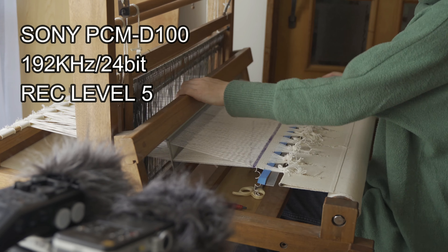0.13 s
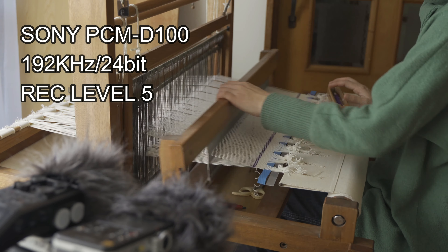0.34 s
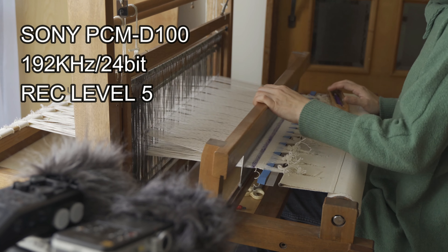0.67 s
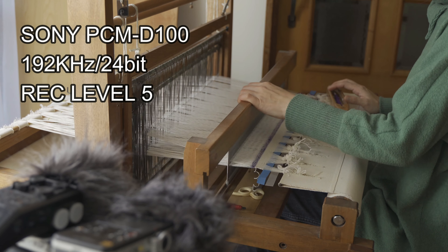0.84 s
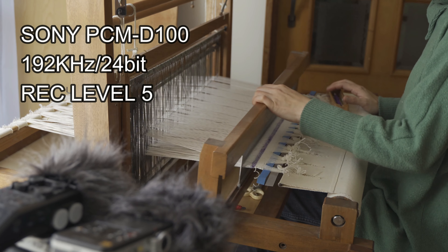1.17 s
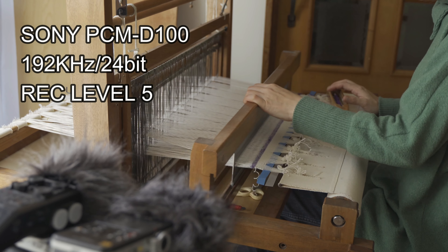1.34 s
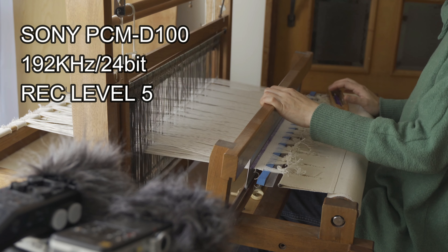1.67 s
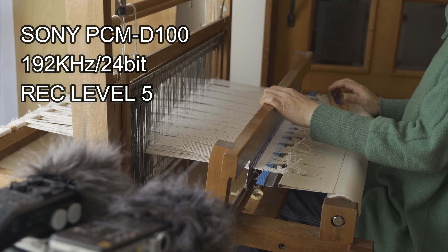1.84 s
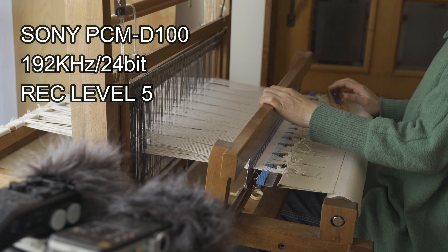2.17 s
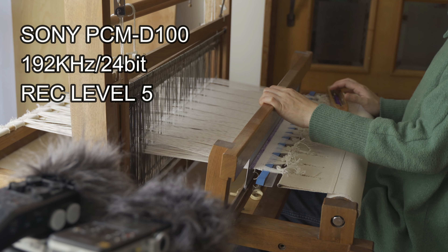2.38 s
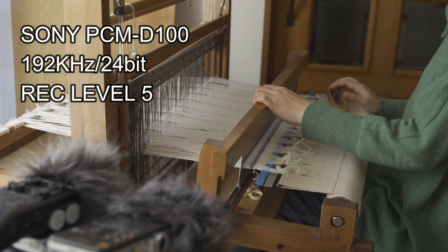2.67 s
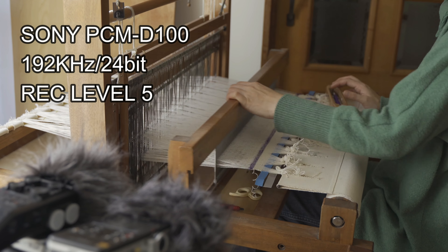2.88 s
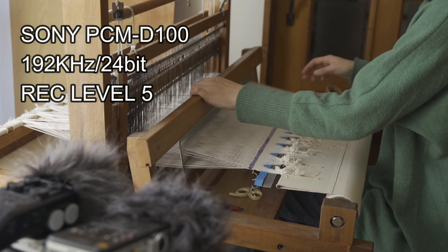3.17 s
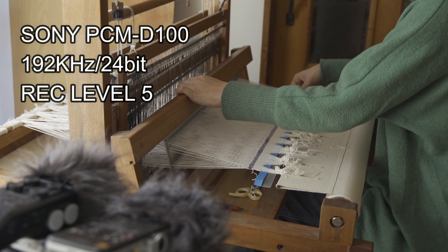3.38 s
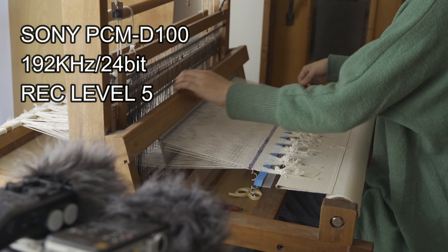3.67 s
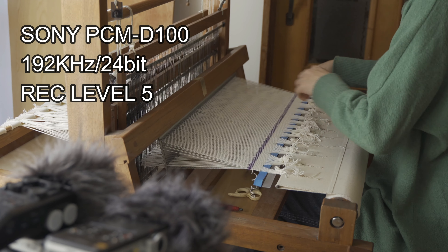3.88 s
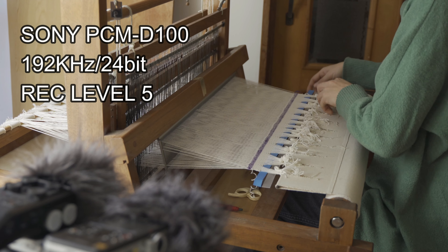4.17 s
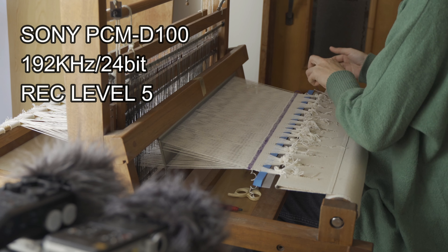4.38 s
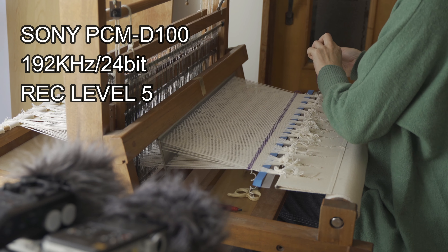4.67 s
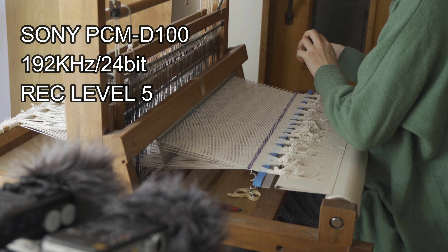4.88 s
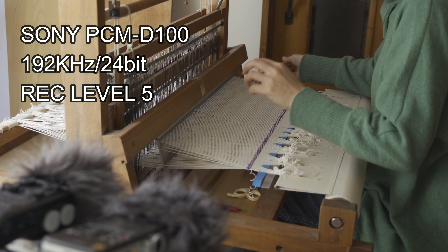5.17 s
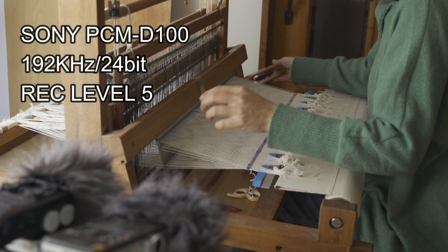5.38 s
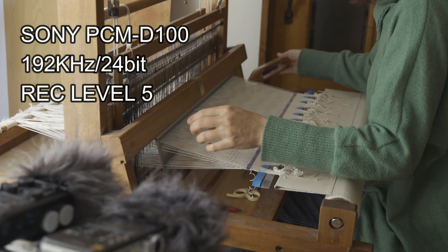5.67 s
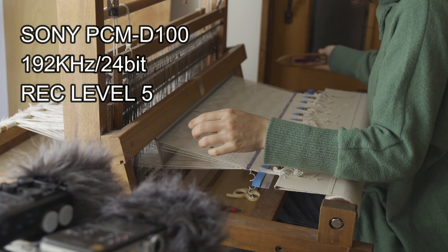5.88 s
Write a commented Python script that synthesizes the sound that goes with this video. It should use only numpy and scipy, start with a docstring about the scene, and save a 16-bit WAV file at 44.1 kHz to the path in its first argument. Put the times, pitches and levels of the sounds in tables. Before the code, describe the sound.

In a quiet small room, a loom rasps, batters out hollow wooden knocks, squeaks back against its stop, and settles into tiny shuttle clicks.

```python
"""A rasping scrape with faint squeaks swells up: the beater of a wooden hand loom swings forward in a small room.
Its reed rasps and sings by stick-slip friction along the warp, while struck wood, as decaying modes and noise,
knocks again and again, the frame thuds in low modes and the heddles chirp. The beater scrapes back and bangs
twice against its stop; small clicks of the shuttle follow, with soft friction noise of yarn and shuttle."""
import sys
import numpy as np
from scipy import signal
from scipy.io import wavfile

SR = 44100
rng = np.random.default_rng(int(sys.argv[2]) if len(sys.argv) > 2 else 0)


def dump(signal):
    """Clip the signal to [-1, 1] and save it as 16-bit WAV at the path in sys.argv[1]."""
    limited = np.clip(np.atleast_2d(signal).T, -1, 1)
    pcm = np.round(limited * 32767).astype(np.int16)
    wavfile.write(sys.argv[1], SR, pcm)


N = 265923
TIME = np.arange(N) / SR
RING_TIME = TIME[:18000]   # span of one blow
CUTOFF_HZ = 16300
EDGES = np.geomspace(22, 17000, 21)
# band filters: (centre frequency [Hz], filter sections)
BANK = [(np.sqrt(lo * hi), signal.butter(2, [lo, hi], "band", fs=SR, output="sos"))
        for lo, hi in zip(EDGES, EDGES[1:])]

# likeness of the left and right channels: (frequency [Hz], correlation [-1 to 1])
LIKENESS = [(60, 0.84), (300, 0.78), (1200, 0.84), (2500, 0.75), (5000, 0.58), (9000, 0.41), (13000, -0.62)]
# pushes of the beater that rock the whole loom: (time [s], level [dB], rebound relative level [dB])
PUSHES = [(0.278, -27.5, -0.5), (0.548, -25.5, -7), (0.679, -19, -11), (1.032, -24, -10),
          (1.163, -15.5, -0.5), (1.431, -23.5, 1.5), (1.604, -18, -1.5), (1.781, -28, -32),
          (2.071, -39.5, -7), (2.99, -25, -5)]


def from_db(db):
    """Amplitude gain is the exponential of a level in decibels."""
    return np.exp(np.asarray(db) * np.log(10) / 20)


def rms_one(x):
    """Normalisation: dividing by the root mean square gives an rms of 1."""
    return x / np.sqrt(np.mean(x ** 2) + 1e-20)


def at_hz(points, hz):
    """Linear interpolation of a table along log frequency."""
    table = np.array(points)
    return np.interp(np.log(hz), np.log(table[:, 0]), table[:, 1])


def drift(rate, size=N):
    """Slow random modulation: normal values, rate [per s] of them, joined by straight lines."""
    steps = np.arange(size) / SR * rate
    return np.interp(steps, np.arange(4000), rng.standard_normal(4000))


def dying(t60):
    """Exponential decay, by 60 dB in t60 [s]."""
    return np.exp(-np.log(1000) * RING_TIME / t60)


def add(out, s, sound):
    """Superposition: a sound is added to the mix from time s [s]."""
    start = max(round(s * SR), 0)
    out[:, start:start + sound.shape[-1]] += sound[..., :N - start]


def grains(spread_db, size=N):
    """Granular friction noise: two independent mid-side pairs of tiny contacts of uneven size."""
    sizes = np.minimum(rng.exponential(1, size), 6)
    return rms_one(rng.standard_normal((2, 2, size)) * from_db(spread_db * sizes))


def coloured(drive, gain_at):
    """Subtractive synthesis: band filters colour mid-side noise; channel correlation sets each band's width."""
    mid_side = 0
    for k, (hz, sos) in enumerate(BANK):
        alike = np.clip(at_hz(LIKENESS, hz), -.99, .99)
        balance = np.sqrt([[1 + alike], [1 - alike]])
        # neighbouring bands take different noise pairs
        mid_side = mid_side + signal.sosfilt(sos, drive[k % 2] * gain_at(hz) * balance)
    mid, side = mid_side
    return np.array([mid + side, mid - side])


def ringing(modes, uneven_db, width, detune):
    """Modal synthesis: decaying sines whose strength, pitch and stereo phase vary from blow to blow."""
    out = 0
    for hz, db, t60 in modes:
        size, turn, apart, shift = rng.standard_normal(4)
        phase = np.pi * (turn > 0) + width * apart * np.array([[1], [-1]])
        tone = np.sin(2 * np.pi * hz * (1 + detune * shift) * RING_TIME + phase)
        out = out + from_db(db + uneven_db * size) * dying(t60) * tone
    return out


def blows(table, spectrum, modes, crack_t60, room_db, modes_db, detune, press_t60, uneven_db):
    """Impact: a short noise crack of crowded modes, a few longer modes and the room's decaying tail."""
    # reverberation of the room: (frequency [Hz], t60 [s])
    room_t60 = [(150, 0.29), (500, 0.4), (1500, 0.25), (4000, 0.22), (12000, 0.18)]
    out, rows = np.zeros((2, N)), np.array(table, float)
    early = SR // 50   # crack and modes are balanced over the first 20 ms
    rows[:, 2:] -= rows[:, 2:].mean(axis=0)   # body and brightness relative to the mean blow
    for s, db, body_db, bright_db in rows:
        colour = [(420, body_db), (1000, 0.002), (2000, 0), (6000, bright_db)]

        def band_gain(hz):
            decay = dying(crack_t60) + from_db(room_db) * dying(at_hz(room_t60, hz))
            return from_db(at_hz(spectrum, hz) + at_hz(colour, hz)) * decay

        wood = coloured(grains(2.6, size=len(RING_TIME)), band_gain)
        tinted = [(hz, level + at_hz(colour, hz), t60) for hz, level, t60 in modes]
        ring = ringing(tinted, uneven_db, width=0.1, detune=detune)
        # dull, padded contacts build up more slowly
        press = 1 - dying(press_t60 * from_db(np.clip(-bright_db, -20, 14)))
        blow = wood / wood[:, :early].std() + from_db(modes_db) * ring / ring[:, :early].std()
        add(out, s, from_db(db) * press * blow)
    return out


def with_body(table, per_force, per_brightness):
    """Contact spectrum: the harder and brighter a contact, the less low body [dB lost per dB]."""
    return [(s, db, -per_force * db - per_brightness * bright_db, bright_db) for s, db, bright_db in table]


def rubbing(spectrum, grain_db, flutter_db):
    """Sliding friction: grainy noise of rms 1 whose bands fluctuate independently."""
    return rms_one(coloured(grains(grain_db), lambda hz: from_db(at_hz(spectrum, hz) + flutter_db * drift(25))))


def singing(hz, waver_hz, slips_per_s=300):
    """Stick-slip tone: uneven slips modulate the frequency, and a phase offset separates the channels."""
    phase = 2 * np.pi * np.cumsum(hz + waver_hz * drift(slips_per_s, size=len(hz))) / SR
    apart = np.arccos(np.clip(at_hz(LIKENESS, hz[0]), -1, 1)) / 2
    return np.sin(phase + apart * np.array([[1], [-1]]))


def swells(rows, rise_db_per_s, fall_db_per_s, sag_db_per_s=0):
    """Movement envelope [dB] of rows (s, length, dB): linear rise, hold and fall; the strongest prevails."""
    levels = []
    for s, length, db in rows:
        rise = rise_db_per_s * np.maximum(s - TIME, 0)
        sag = sag_db_per_s * np.clip(TIME - s, 0, length)
        fall = fall_db_per_s * np.maximum(TIME - s - length, 0)
        levels.append(db - rise - sag - fall)
    return np.max(levels, axis=0)


def after_pushes(delay_s, hold_s, level_db, follows):
    """Driven response: one movement (s, length, dB) per push, stronger and longer after a harder one."""
    usual_push_db = -20   # hold_s and level_db apply at this push
    extra = [(s, follows * (db - usual_push_db)) for s, db, _ in PUSHES]
    return [(s + delay_s, hold_s * from_db(db), level_db + db) for s, db in extra]


def shaft_level():
    """Forced motion [dB]: the shafts move when a push shakes them or a treadle lifts them."""
    # feet working the treadles: (time [s], length [s], level [dB])
    treadling = [(0.28, 0.334, -32.5), (0.93, 0.027, -35), (2.02, 0.011, -36), (2.53, 0.061, -43),
                 (2.72, 0.42, -39), (3.48, .01, -40.5)]
    shakes = after_pushes(delay_s=-.02, hold_s=0.1, level_db=-30.5, follows=0.51)   # just ahead of the push
    shaken = swells(shakes, rise_db_per_s=166.5, fall_db_per_s=105)
    return np.maximum(shaken, swells(treadling, rise_db_per_s=97, fall_db_per_s=45))


def reed_level():
    """Sliding motion [dB]: the reed rubs in strokes, on springing back, and faintly as the shafts move."""
    # beater swinging forward, later back:
    # (time at full speed [s], length [s], relative level [dB], rise [dB per s])
    swings = [(0.201, .15, -35, 52), (2.912, .39, -37, 191.5)]
    strokes = [swells([(s, length, db)], rise, fall_db_per_s=68, sag_db_per_s=14)
               for s, length, db, rise in swings]
    springs = after_pushes(delay_s=0.12, hold_s=.04, level_db=-45.5, follows=0.376)
    spring = swells(springs, rise_db_per_s=73.5, fall_db_per_s=52)
    rattle = shaft_level() - 17   # the reed shivers with the shafts
    return np.max([*strokes, spring, rattle], axis=0)


def air():
    """Stationary background noise: the spectrum of a quiet room."""
    # (frequency [Hz], relative density [dB])
    air_spectrum = [(20, 9), (70, -1.5), (120, -7), (220, -9), (500, -14), (1200, -22.5), (3000, -26),
                    (16000, -31)]
    noise = coloured(rng.standard_normal((2, 2, N)), lambda hz: from_db(at_hz(air_spectrum, hz)))
    return from_db(-56) * rms_one(noise)


def lean():
    """Low-frequency friction: the frame rumbles softly as the weaver leans on it."""
    # (time [s], length [s], level [dB])
    leanings = [(4.22, 0.041, -53.5), (4.95, .23, -54.5)]
    rumble = rubbing([(30, -16.5), (65, 9), (130, -34), (600, -60)], grain_db=0.0, flutter_db=2.0)
    return from_db(swells(leanings, rise_db_per_s=38, fall_db_per_s=53)) * rumble


def brush():
    """Broadband friction: yarn brushes the threads."""
    # (time [s], length [s], relative level [dB])
    strokes = [(3.79, 0.018, -53), (3.98, 0.052, -56), (4.22, 0.056, -59), (4.74, .2, -63.5),
               (5.15, 0.044, -61), (5.78, .02, -67), (6.02, 0.0082, -66.5)]
    # (frequency [Hz], relative density [dB])
    brush_spectrum = [(300, -16), (600, -5.5), (1800, -3), (2800, -11.5), (3600, -8.5), (5500, -17),
                      (12000, -21.5), (16000, -31.5)]
    level_db = swells(strokes, rise_db_per_s=51.5, fall_db_per_s=46.5) - 1.0
    return from_db(level_db) * rubbing(brush_spectrum, grain_db=5.5, flutter_db=2.5)


def shuttle(hz=4200, width_hz=300):
    """Resonant filtering of friction: the shuttle slides through the shed with a thin, narrow hiss."""
    # (time [s], length [s], level [dB])
    slides = [(5.08, 0.09, -58.5), (5.24, 0.075, -65.5), (5.785, 0.009, -67)]
    friction = rubbing([(1000, -6.5), (4000, 1), (12000, 15)], grain_db=5.0, flutter_db=4.0)
    hiss = signal.lfilter(*signal.iirpeak(hz, hz / width_hz, fs=SR), friction)
    return from_db(swells(slides, rise_db_per_s=280, fall_db_per_s=140)) * rms_one(hiss)


def clicks():
    """Light impacts: shuttle and fittings click, exciting small, high modes."""
    # (time [s], relative level [dB], brightness [dB])
    contacts = [(2.912, -20, 8), (3.396, -24, -12.5), (3.545, -25.5, -2), (3.566, -28, -8),
                (3.605, -24.5, -2.5), (3.788, -35, -2), (3.949, -25, 0), (4.209, -24, -3),
                (4.488, -35, 9.5), (4.812, -44, -5.5), (4.959, -50, -5), (5.204, -37, 17.5),
                (5.773, -43.5, 6), (5.788, -47.5, -6)]
    # colour of a click: (frequency [Hz], relative density [dB])
    click_spectrum = [(300, -51), (700, -19.5), (1150, -6.5), (2300, -11.5), (4000, -10.5), (7000, -20.5),
                      (16000, -35.5)]
    # ringing of shuttle and fittings: (nominal frequency [Hz], relative level [dB], t60 [s])
    click_modes = [(1016, -7.5, 0.14), (1367, -4, 0.27), (1900, -5, 0.17), (2320, -6.5, 0.15),
                   (2630, -0.5, .1), (3343, -18, 0.17), (3860, 0.5, 0.082), (5000, -15.5, .07),
                   (7000, -9, .1)]
    rows = with_body(contacts, per_force=.05, per_brightness=.05)
    return from_db(-14) * blows(rows, click_spectrum, click_modes, crack_t60=0.04, room_db=6.5,
                                modes_db=-3.0, detune=0.008, press_t60=0.0006, uneven_db=0.0)


def shift():
    """Friction under forced motion: the moving shafts rumble."""
    # (frequency [Hz], relative density [dB])
    shift_spectrum = [(22, -17.5), (55, 2), (110, -2), (200, -3), (300, -10), (450, -11), (800, -19),
                      (2500, -26), (5000, -55.5)]
    return from_db(shaft_level()) * rubbing(shift_spectrum, grain_db=4.0, flutter_db=4.0)


def squeaks(waver=0.0053, top_waver=0.028, wobble=0.0037, rough_db=5.0, overtone_db=-16):
    """Stick-slip oscillation: sticking steel sings brief, unsteady tones with weaker harmonics."""
    # reed wires and threads: (time [s], length [s], start [Hz], end [Hz], relative level [dB])
    tones = [(0.042, 0.25, 2420, 2475, -39.5), (0.077, 0.12, 1930, 1990, -47),
             (1.739, 0.23, 2950, 2860, -43.5), (2.826, 0.08, 4680, 4620, -44.5),
             (2.825, 0.074, 2320, 2390, -51), (2.865, 0.18, 2500, 2463, -32),
             (3.012, 0.1, 11000, 9560, -42.5), (3.24, 0.11, 2880, 2810, -41),
             (3.246, 0.079, 12600, 12500, -44), (2.92, 0.56, 852, 798, -45.5),
             (3.05, 0.408, 1280, 1340, -49.5), (3.46, 0.4, 810, 785, -45.5),
             (3.495, 0.21, 1350, 1325, -46.5), (4.613, 0.2, 2170, 1980, -64.5),
             (4.884, 0.1, 3670, 3550, -63.5)]
    # heddles chirping on a hard beat: (time [s], relative level [dB])
    chirp_times = [(0.668, -48), (1.007, -41), (1.159, -42.5), (1.472, -50), (1.604, -43.5)]
    # the two tones of every chirp: (delay [s], length [s], frequency [Hz], relative level [dB])
    chirp_tones = [(0, 0.061, 9440, 1.5), (0.053, 0.076, 12300, -10)]
    out = np.zeros((2, N))
    chirps = [(s + delay, length, hz, hz, db + tone_db)
              for s, db in chirp_times for delay, length, hz, tone_db in chirp_tones]
    for s, length, start_hz, end_hz, db in tones + chirps:
        n = int(length * SR)
        pitch = np.linspace(start_hz, end_hz, n) * (1 + wobble * drift(56, size=n))
        waver_hz = (top_waver if start_hz > 7000 else waver) * pitch
        for k in range(min(int(CUTOFF_HZ / start_hz), 3)):
            swell = signal.windows.tukey(n, .6) * rms_one(from_db(rough_db * drift(238, size=n)))
            tone = singing((k + 1) * pitch, waver_hz, slips_per_s=790)
            add(out, s, from_db(db + overtone_db * np.sqrt(k)) * swell * tone)
    return from_db(3) * out


def reed(glide=.008, flicker_db=12.5, rough_db=10.5, rise=.002, hiss_per_db=-0.1, song_per_db=.22, pair=.022):
    """Stick-slip on the reed: a rasp and wires singing in turns; speed sets treble, pitch and share of tone."""
    # colour of the rasp: (frequency [Hz], relative density [dB])
    scrape_spectrum = [(300, -15), (700, -8.5), (1400, -6), (2700, -4), (5000, -8), (8000, -13),
                       (11000, -19), (16000, -18)]
    # singing wires: (nominal frequency [Hz], waver [Hz], relative level [dB])
    reed_modes = [(773, 20, -19), (1337, 20, -3.5), (1935, 18, -4), (2214, 28, -9.5), (2477, 18, 0),
                  (2720, 19, -5.5), (2987, 25, -4.5), (3496, 32, -3), (4160, 24, -3), (4700, 34, -8),
                  (5200, 88, -4), (5650, 44, -20.5), (6180, 40, -10.5), (7220, 74, -9), (8190, 110, -12)]
    level_db = reed_level()
    n = np.flatnonzero(level_db > -70)[-1]   # silent from here on
    level_db = level_db[:n]
    speed_db = np.clip(level_db + 40, -15, 3)   # the level stands for the speed
    treble = from_db(hiss_per_db * speed_db)

    def band_gain(hz):
        return from_db(at_hz(scrape_spectrum, hz)) * (treble if hz > 8000 else 1)

    rasp = coloured(grains(2.76, size=n), band_gain)
    wires = 0
    for hz, waver_hz, db in reed_modes:
        for k in range(2):   # each wire has a weaker neighbour, tuned slightly higher
            flicker = flicker_db * np.tanh(drift(22, size=n))
            rough = rough_db * np.tanh(drift(200, size=n))
            pitch = hz * (1 + pair * k + glide * drift(12, size=n) + rise * speed_db)
            wires = wires + from_db(db - 2.1 * k + flicker + rough) * singing(pitch, waver_hz)
    song = from_db(0.5 + song_per_db * speed_db) * rms_one(wires)   # a slow reed mostly rasps
    scrape = from_db(level_db + 0.9) * (rms_one(rasp) + song)
    return np.pad(scrape, ((0, 0), (0, N - n)))


def thuds():
    """Low modes with inertia: the heavy frame starts rocking gradually after a push and after its rebound."""
    # (nominal frequency [Hz], relative level [dB], t60 [s])
    rocking_modes = [(47.8, -2, 0.64), (56.6, -5.5, 0.42), (74.9, 1.5, 0.36), (93.7, -9.5, 0.9),
                     (122.2, -4.5, 0.48), (141, -13, 0.16)]
    rebound_s = 0.061   # the frame lands a second time
    out = np.zeros((2, N))
    for s, db, rebound_db in PUSHES:
        for start, level_db in (s, db), (s + rebound_s, db + rebound_db):
            rocking = ringing(rocking_modes, uneven_db=0.5, width=0.19, detune=0.026)
            add(out, start, from_db(level_db) * (1 - dying(0.024)) * rocking)
    return out


def bang():
    """Impact on a stop: the beater hits, one end after the other, and its modes ring."""
    # (time [s], relative level [dB], body [dB], brightness [dB])
    hits = [(3.651, -7, -9.5, 5), (3.6745, -14.5, 11, -9.5)]
    # colour of the bang: (frequency [Hz], relative density [dB])
    bang_spectrum = [(35, 0), (70, 1.5), (140, -2), (230, 5), (320, -2), (430, -0.5), (600, -2.5),
                     (900, -4.5), (1150, -21), (1500, -6), (2700, -20.5), (3900, -28.5), (6000, -42),
                     (16000, -79.5)]
    # ringing of the beater: (nominal frequency [Hz], relative level [dB], t60 [s])
    bang_modes = [(202.6, 2, 0.54), (224, 8, 0.14), (324, -20, .3), (402, 0, .26), (445, 0.5, 0.33),
                  (513, -4, .22), (753, -1.5, 0.41), (772, -17.5, 0.068), (859, 7, 0.11), (965, -3, 0.24),
                  (1217, -7.5, 0.12), (1450, -0.5, 0.1), (1100, -16.5, 0.27), (1590, -4.5, .12)]
    return from_db(-9.5) * blows(hits, bang_spectrum, bang_modes, crack_t60=0.066, room_db=5.5,
                                 modes_db=0.5, detune=0.0067, press_t60=0.0029, uneven_db=1.5)


def knocks():
    """Impact excitation: beater and treadles knock in the frame; light, dull contacts are mostly low body."""
    # (time [s], relative level [dB], brightness [dB])
    contacts = [(0.258, -18.5, -3.5), (0.284, -18, -11.5), (0.297, -13, -0.5), (0.312, -12.5, -5),
                (0.351, -18.5, 13.5), (0.556, -22, 12), (0.62, -24.5, -8.5), (0.685, -21, -5.5),
                (0.763, -14.5, -28.5), (0.796, -19.5, -1), (0.865, -22.5, -7.5), (1.004, -21.5, -2),
                (1.015, -17.5, 8), (1.041, -12, 4), (1.161, -10, 10.5), (1.188, -11, 5.5),
                (1.224, -11.5, 10.5), (1.256, -17, -4), (1.28, -14, -17.5), (1.44, -18, 16),
                (1.469, -14, 7.5), (1.486, -10, -1), (1.51, -19.5, 12.5), (1.6, -13, 10.5), (1.617, -11, 0),
                (1.639, -19, 7), (1.662, -13.5, 11), (1.772, -14.5, 10), (1.958, -25, 12.5),
                (2.103, -24.5, 2), (2.671, -23.5, -33.5), (2.758, -20.5, -27.5), (3.032, -19.5, -25),
                (3.452, -24.5, -35.5)]
    # colour of a knock: (frequency [Hz], relative density [dB])
    knock_spectrum = [(60, -19), (120, -4.5), (300, -8), (480, -6.5), (900, -9.5), (1600, -9.5),
                      (2800, -14), (4200, -22.5), (6000, -39.5), (9500, -33), (16000, -94)]
    # ringing of the frame: (nominal frequency [Hz], relative level [dB], t60 [s])
    frame_modes = [(209.9, -4.5, 0.32), (448, -0.5, 0.24), (615, -5, 0.14), (908, -6.5, 0.3),
                   (1075, -6.5, 0.36), (1505, -5, 0.19), (1737, 1.5, 0.091), (2057, 1.5, 0.094),
                   (2670, -11.5, .14), (2864, -6, 0.11), (3720, -8.5, 0.051), (3910, -26.5, 0.58)]
    rows = with_body(contacts, per_force=0.5, per_brightness=.2)
    return from_db(-12) * blows(rows, knock_spectrum, frame_modes, crack_t60=0.08, room_db=4.0,
                                modes_db=-2, detune=0.0297, press_t60=0.0045, uneven_db=5.5)


def scene():
    """Level panning: the loom a little to the left; brushing, shuttle slides and air a little to the right."""
    loom = lean() + clicks() + shift() + squeaks() + reed() + thuds() + bang() + knocks()
    soft = air() + brush() + shuttle()
    return loom * from_db([[.6], [-.6]]) + soft * from_db([[-.4], [.4]])


def record(dry):
    """Band limiting: a steep elliptic low-pass filter removes the top."""
    return signal.sosfilt(signal.ellip(10, .1, 80, CUTOFF_HZ, fs=SR, output="sos"), dry)


dry = scene()
out = record(dry)
dump(out)
```